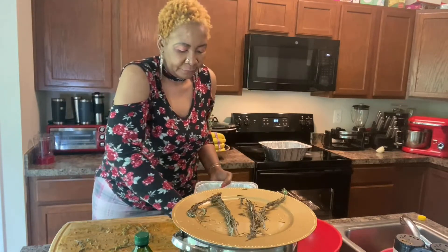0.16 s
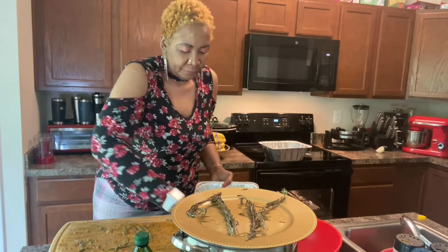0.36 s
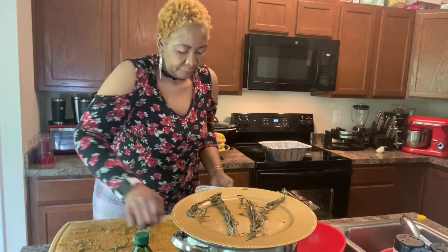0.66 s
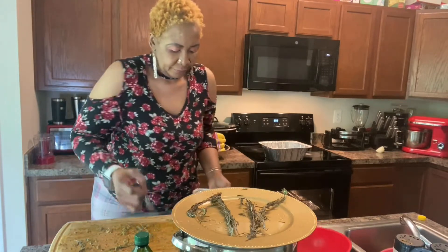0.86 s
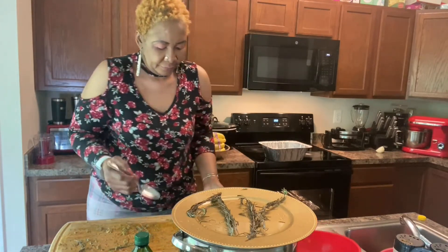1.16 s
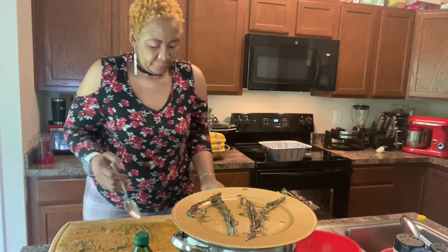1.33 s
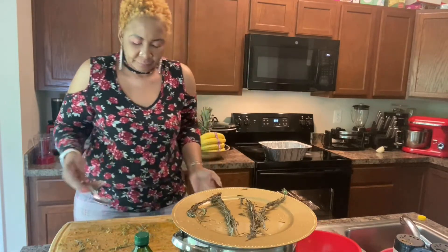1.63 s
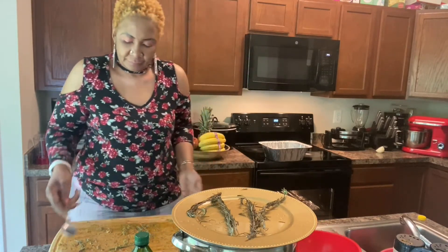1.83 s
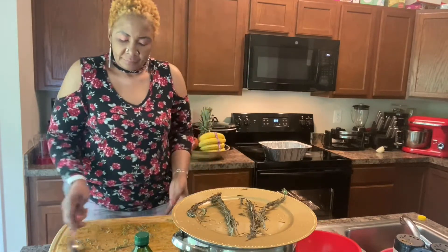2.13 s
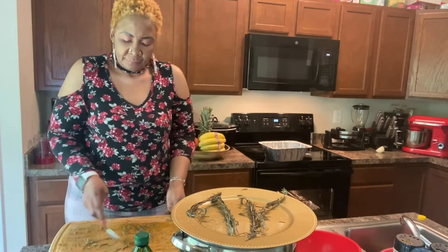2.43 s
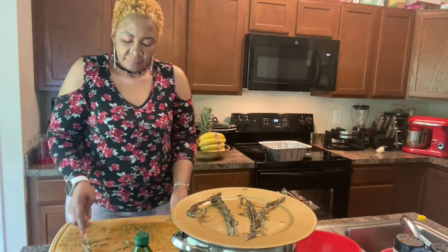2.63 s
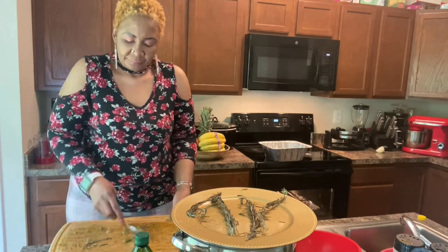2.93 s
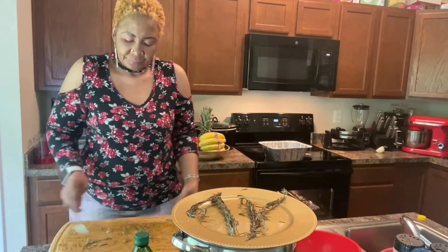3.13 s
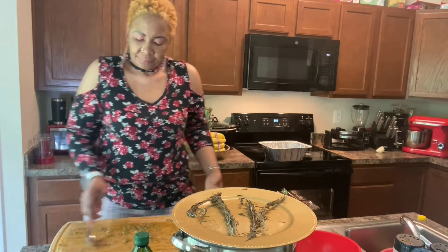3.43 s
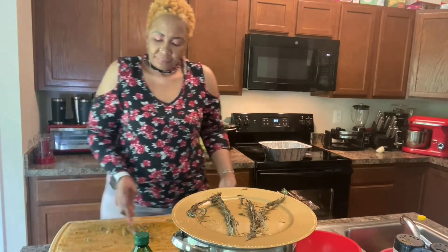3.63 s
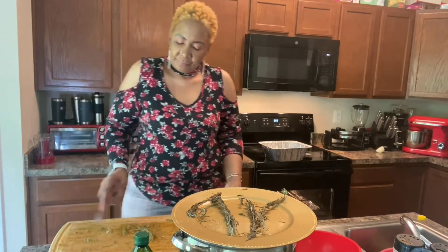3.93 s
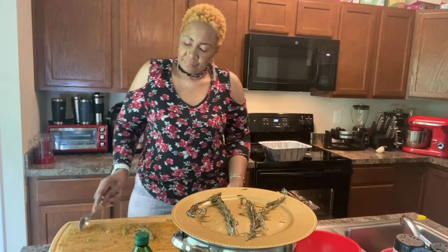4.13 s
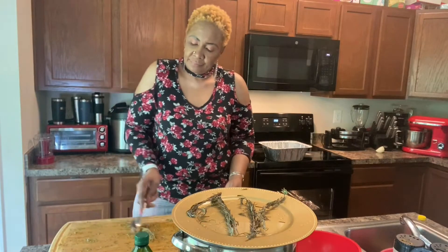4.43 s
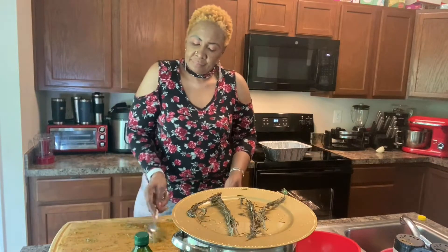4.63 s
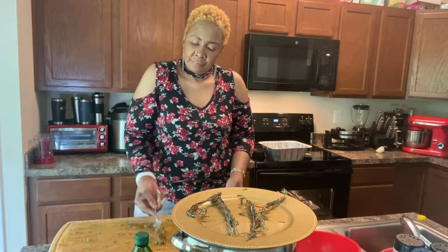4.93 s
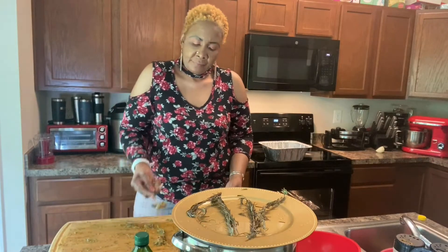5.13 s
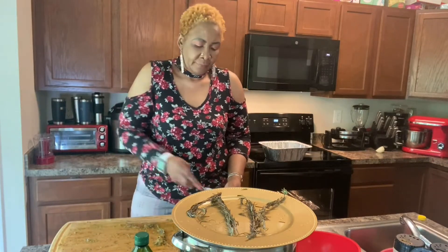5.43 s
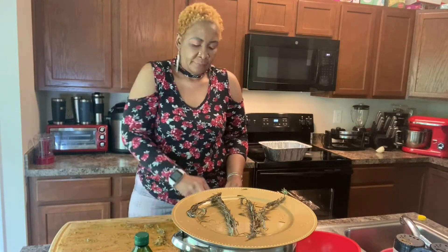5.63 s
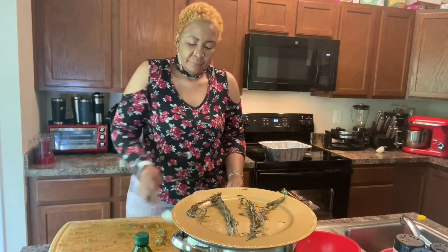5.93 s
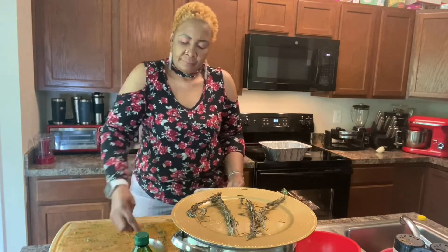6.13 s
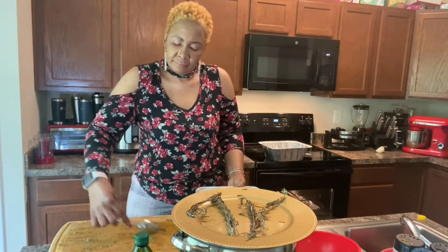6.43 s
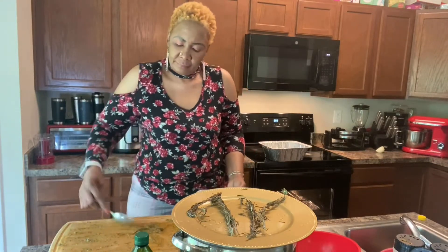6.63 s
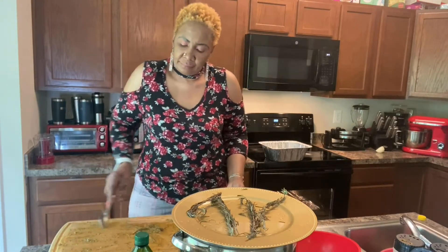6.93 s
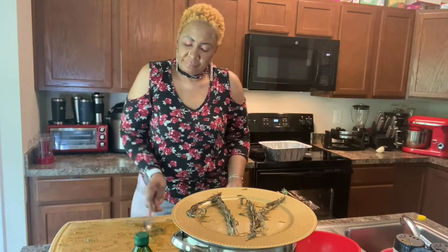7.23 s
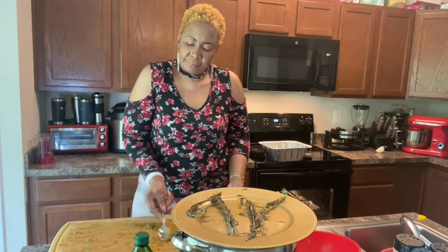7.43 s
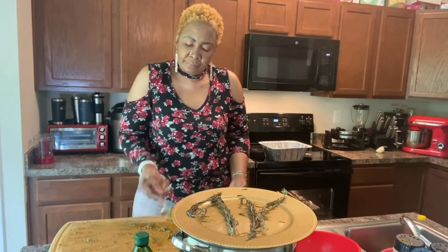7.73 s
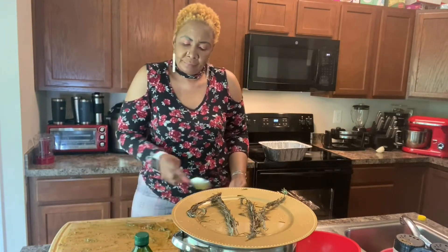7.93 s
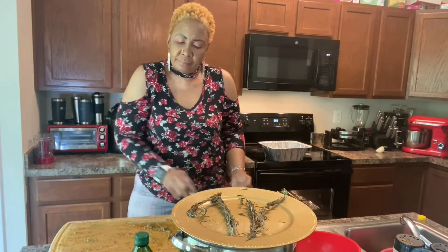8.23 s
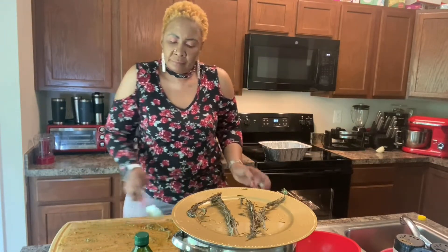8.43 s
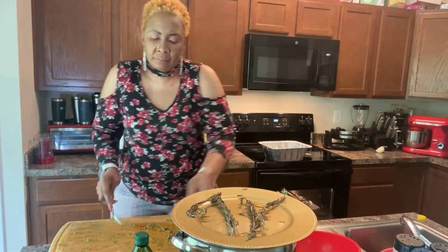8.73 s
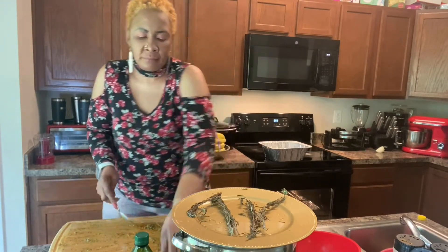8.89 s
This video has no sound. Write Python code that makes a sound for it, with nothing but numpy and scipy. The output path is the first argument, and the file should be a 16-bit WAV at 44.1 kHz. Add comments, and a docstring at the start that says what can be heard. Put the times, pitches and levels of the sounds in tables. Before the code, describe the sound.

A foil pan grinds and bumps against dishes, the strongest knocks coming just before one second. Then a spoon works over a wooden board: soft scrapes, clicking taps, pauses, and a few harder knocks. Late on comes a short bright rasp on foil with a faint crinkle, then a quick bouncing metallic clatter that rings on. Low appliance hum and airy rush continue throughout, in a short, lively kitchen echo, heard through one mono microphone.

```python
"""In a small, hard-walled kitchen an appliance hums throughout: wavering tones over a soft rush of noise.
A foil pan is pushed against dishes: tiny slips ring its floor and walls, and each knock is a crack plus ringing.
Then a metal spoon taps and scrapes a wooden board: slips ring board and spoon, or hiss softly in moist scraps.
The spoon rasps over the foil rim as a short burst of bright slips, and the thin wall crinkles back.
Last, the spoon drops and clatters: four blows with long, metallic ringing."""
import sys
import numpy as np
from scipy import signal
from scipy.fft import rfft, irfft
from scipy.io import wavfile
from scipy.ndimage import uniform_filter1d, map_coordinates

SR = 44100
rng = np.random.default_rng(int(sys.argv[2]) if len(sys.argv) > 2 else 0)


def pcm_store(signal):
    """Save signal as 16-bit PCM."""
    levels = np.round(np.clip(np.atleast_2d(signal), -1, 1) * 32767)
    wavfile.write(sys.argv[1], SR, levels.astype(np.int16).T)


N = 399546
TIME = np.arange(N) / SR

# Event levels below come before the trims set in the sound functions; "re level" means added to level_db.
# appliance tones, before they waver: pitch_hz, level_db
HUM_TONES = [(59.3, -81), (119, -72.5), (258.6, -66), (293.5, -67.5), (387.6, -69.5), (3471, -87)]
# colour of the appliance's rush of air: pitch_hz, density_db_per_hz
AIR_COLOUR = [(18, -45), (30, -28), (53, -19.5), (86, -13.5), (115, -2), (145, -10.5), (194, -6.5),
              (227, -7.5), (295, -2.5), (319, -5), (540, -12.5), (844, -14.5), (2290, -27.5), (5590, -30.5),
              (16000, -47.5)]

# the pan is pushed over the counter:
# peak_s, rise_s, fall_s, level_db, floor_boom_db (re level), grit_db (re level)
PAN_PUSHES = [(.005,.08,.09,-42,-31,-9), (.14,.08,.09,-52,-14,-9), (.295,.06,0.11,-49,-20,-13),
              (.41,0.12,0.13,-47,-14,-11.5), (.535,0.11,0.094,-45,-0.5,-17), (.64,0.094,0.13,-47,1,-14.5),
              (.725,.08,0.1,-51.5,-7,-8), (.86,.15,0.15,-43,-10,-11), (.962,.06,0.075,-34,-20,-24),
              (1.045,0.066,0.1,-34.5,-8.5,-20), (1.125,.06,0.086,-48,-3,-9.5)]
# resonances of the pan's floor: pitch_hz, width_hz, level_db
PAN_FLOOR_MODES = [(128, 26, -9), (179.4, 14, -0.5)]
# resonances of the pan's walls: pitch_hz, width_hz, level_db
PAN_WALL_MODES = [(470, 52, 1.5), (568, 27, 4), (735, 150, 2.5), (926, 140, 2.5), (1093, 42, 2),
                  (1304, 69, -1), (1420, 31, -17)]
# colour of the pan grinding on crumbs: pitch_hz, density_db_per_hz
CRUMB_COLOUR = [(1060, -37), (1800, -3), (2620, -4), (4290, -7.5), (7770, -14), (8750, -19.5), (15100, -23),
                (16000, -27)]

# pan and dishes knock together: start_s, level_db, thump_db (re level), hardness_db (re level)
DISH_KNOCKS = [(.007,-58.5,2,2), (.0625,-44.5,-14,-5), (.073,-35,-13,-7), (.2525,-48,-18,-6),
               (.319,-43.5,-17,-9), (.368,-37,-14,-7.5), (.438,-46.5,-7,-19), (.578,-37.5,-13,-26),
               (.602,-37,-8.5,-13.5), (.7565,-23,-20,-20.5), (.8445,-24,-28,-21), (.924,-39.5,-9.5,-23),
               (1.013,-38,-1,-18), (1.054,-37,-4.5,-13.5), (1.087,-45,-5,-17)]
# what pan and dishes ring with, before detuning: pitch_hz, level_db, t60_s (time to fade by 60 dB)
DISH_MODES = [(182, -15, 0.18), (472, -1, 0.077), (558.6, -4, 0.16), (737, 5.5, 0.061), (918, -0.5, 0.1),
              (1092, 8, 0.098), (1306, -8.5, 0.28), (1530, -5.5, 0.12), (1900, -14.5, 0.41)]
# colour of the knocks' cracks: pitch_hz, density_db_per_hz
DISH_COLOUR = [(41, -70), (70, -26.5), (174, -8), (314, -12.5), (506, -11), (554, -9.5), (664, -7.5),
               (744, -1.5), (892, -1.5), (1000, -10.5), (1410, -7), (2170, -23), (4280, -29.5),
               (13000, -56), (16000, -49)]
# where a blow is split into bass, body, edge and air: crossover_hz
BAND_EDGES_HZ = [400, 1800, 6500]
# single ringing partials; rows close together form one clink, others are a short squeak or a knock's ring:
# start_s, pitch_hz, level_db, t60_s
RINGING_PARTIALS = [(.007, 323, -39, 0.17), (0.062, 5780, -35, 0.05), (.064, 687, -29.5, 0.13),
                    (.073, 852, -30, 0.19), (.066, 9750, -57, 0.26), (.066, 12500, -62, .2),
                    (.066, 13800, -62, .2), (.074, 1886, -39.5, 0.224), (0.073, 3058, -52, 0.28),
                    (.2525, 7680, -57, 0.086), (.746, 1280, -29.5, 0.058), (1.654, 3500, -65, 0.17),
                    (2.862, 852, -42, 0.22), (3.23, 4400, -40.5, 0.016), (3.259, 504.9, -39.5, 0.084),
                    (6.78, 8050, -41, 0.054)]

# the spoon meets the board or the pan's rim:
# start_s, level_db, thump_db (re level), hardness_db (re level), wetness (0 dry .. 1 in moist scraps)
SPOON_TAPS = [(1.654,-76.5,10,5.5,0.91), (2.376,-69,7,5,0.31), (2.822,-70.5,2,20.5,0.28),
              (3.23,-68,0,3,.45), (3.258,-56,-1,-6.5,0.59), (3.765,-53,-15,-2,0.00066),
              (3.944,-59.5,-2,-9,.2), (4.031,-38,-12.5,-4.5,0.02), (4.288,-47,-9,-10,.3),
              (4.41,-71,-1,1.5,0.95), (4.929,-57,2.5,-4,0.53), (5.537,-49.5,-12,-8.5,0.55),
              (5.559,-73.5,5,16,0.82), (5.929,-43.5,-11.5,-6.5,0), (6.061,-39,-22,-9.5,0.042),
              (6.551,-49.5,-3.5,-6,.55), (6.7795,-37,-19,-6,.22), (6.91,-41.5,-19.5,-14.5,.15),
              (6.926,-42,-18,-9.5,0.0082), (8.082,-64.5,4,1,1)]
# what the board rings with, before detuning: pitch_hz, level_db, t60_s
BOARD_MODES = [(499, 2, 0.065), (812, 7.5, 0.066), (1117, -1, 0.069), (1435.5, 5.5, 0.051),
               (1796, -9, 0.028), (3340, -16, 0.078), (4100, -8, .04), (5050, -1.5, 0.04),
               (6070, -7.5, 0.024), (8050, -26, 0.022), (9770, -29, 0.063), (12700, -23, 0.11),
               (13400, -33, .07)]
# colour of the taps' cracks: pitch_hz, density_db_per_hz
TAP_COLOUR = [(200, -19.5), (500, -10), (1000, 2.5), (1400, -1.5), (1900, -2), (2400, -11.5), (3600, -9.5),
              (5200, -23.5), (8000, -34), (16000, -43.5)]

# spoon strokes on the board: peak_s, rise_s, fall_s, level_db, scratch_db (re level), hiss_db (re level),
# bite (1 bare edge on wood .. 0 smearing moist scraps)
SPOON_STROKES = [(2.11,0.07,.06,-55.5,-3,-13,0.99), (2.22,0.15,.14,-50.5,1,-6.5,0.89),
                 (2.705,.08,0.0804,-57.5,3.5,-5,1), (2.785,.07,.07,-67.5,0.5,4.5,0.17),
                 (2.867,0.0564,0.057,-44.5,-3.5,-13.5,0.59), (3.22,.12,.12,-71.5,4,-2,.95),
                 (3.39,0.074,0.11,-47.5,-5,-10,.95), (3.495,0.13,.18,-39,-5.5,-17.5,.7),
                 (3.62,.06,0.096,-60,-12,-8.5,0.38), (4.215,.11,0.15,-40.5,-5,-14.5,.9),
                 (4.37,0.14,0.13,-47,-4.5,-14,.6), (4.6,.13,0.12,-62.5,-2,-4.5,0),
                 (5.0,.08,0.31,-62.5,-7.5,-13,0), (5.66,0.11,.14,-57.5,-11.5,-13.5,0),
                 (6.165,.085,.12,-54.5,-8.5,-16,1), (6.345,.14,.16,-63,0,-4,0.018),
                 (6.89,0.071,.12,-51,-6,-20,0.98), (7.04,.15,.2,-44.5,-1,-12,.75),
                 (7.14,.06,.11,-50.5,-4.5,-19,.6), (7.225,0.084,0.059,-47.5,-15,-22,.3),
                 (7.305,0.051,0.075,-57,-6,-14,.1), (7.41,0.083,0.14,-58.5,-3,-13.5,0.062),
                 (7.635,0.11,0.059,-67,2,-18,.4)]
# colour of the scraping: pitch_hz, density_db_per_hz
SCRAPE_COLOUR = [(200, -29.5), (450, -2), (800, 1), (1300, -5), (1800, -5.5), (3000, -9.5), (4500, -14),
                 (8000, -23.5), (10500, -31.5), (16000, -33.5)]
# resonances of board and hand-held spoon, before the pitch wanders: pitch_hz, width_hz, level_db
SCRAPE_MODES = [(787, 99, 1.5), (1245, 320, 4.5), (2050, 620, 0), (2875, 310, 1.5), (3500, 170, 2.5),
                (4050, 190, -4), (5100, 220, 4.5), (6055, 160, 8), (7800, 290, 1.5), (9100, 170, 7.5),
                (9260, 89, 4), (12300, 250, 8.5), (13350, 200, 11), (15200, 220, 2)]

# Three movements at the foil rim; delay_s is the peak counted from RIM_S.
# a soft drag just ahead of the catch and through it: delay_s, rise_s, fall_s, level_db
RIM_DRAG = (-0.05, 0.01, 0.16, -55)
# the loud rasp as the spoon catches the rim: delay_s, rise_s, fall_s, level_db
RIM_CATCH = (0, .0095, 0, -35.5)
# the foil wall flexes back: delay_s, rise_s, fall_s, level_db
FOIL_FLEX = (0.2, 0.06, 0.06, -47)
# colour of the rasp: pitch_hz, density_db_per_hz
RASP_COLOUR = [(1180, -56), (2000, -32), (2780, -7.5), (3200, -14), (4490, -1.5), (4900, -2), (6880, -0.5),
               (7640, -3), (8850, -19), (9660, -11), (10900, -23), (14300, -21), (16000, -30)]
# resonances of the foil wall: pitch_hz, width_hz, level_db
FOIL_MODES = [(356, 44, 2), (930, 230, -5.5), (1460, 630, -14.5), (2400, 350, -10), (2820, 140, -11)]

# the spoon falls and bounces: start_s, level_db, thump_db (re level), hardness_db (re level)
SPOON_DROP = [(8.8815,-43,-21,11), (8.9165,-32.5,-28,3.5), (8.937,-41,-29,5.5), (8.987,-43.5,-6,2)]
# what the dropped spoon rings with, before detuning: pitch_hz, level_db, t60_s
DROP_MODES = [(1028, 4, .2), (1127, -1, .3), (1230, 5, 0.22), (1414, 3, 0.26), (1762, -6, .45),
              (1915, -3, .45), (2400, 0, 0.94), (2630, -1, 0.7), (2670, -1, 0.56), (2885, 1.5, 0.65),
              (2962, -8, .35), (4035, -10, .3), (4470, -7, .25), (4870, -13, .3), (5650, -2, 0.23),
              (5860, -3, 0.2), (7327, -16, .2)]
# colour of the drop's cracks: pitch_hz, density_db_per_hz
DROP_COLOUR = [(120, -55), (200, -23), (347, -25), (440, -10.5), (635, -6), (696, -13), (1020, -4),
               (2050, -2.5), (2290, -11.5), (2610, -4.5), (4520, -4.5), (5940, -7.5), (16000, -19)]

# how long the room's tail takes to fade by 60 dB: pitch_hz, t60_s
ROOM_T60 = [(120, 0.34), (500, 0.39), (1500, 0.38), (5000, 0.33), (9000, .3), (15000, 0.19)]

AIR_LEVEL_DB = -58.19
SWELL_DB, SWELL_SHAPE = 20, 1.408   # drop at the ends of rise and fall; shape 1 = pointed, 2 = round
FIRM_DB, GLANCE_RANGE_DB, GLANCE_TAIL_DB = -37, 8, 5.5   # lighter blows glance and get a stronger tail
WET_AIR_DB = 29   # a fully wet tap spits this much more in the top band
BITE_LOSS_PER_S = 1.6   # scraps gather under the edge, so bite falls during a stroke
HISS_LEAD_S, BOARD_LAG_S = 0.015, 0.0055   # the edge hisses first; the board answers as the hand bears down
RIM_S, RASP_SHAPE = 8.139, 3.5   # moment of the catch; a high shape makes a more abrupt swell
CUTOFF_HZ = 15900


def from_db(db):
    """Turn decibels into a plain gain."""
    return 10 ** (np.asarray(db) / 20)


def rms(x):
    """Average strength of a sound."""
    return np.sqrt(np.mean(x ** 2) + 1e-20)


def at_hz(points, hz):
    """Read a table between its points, on a log-frequency axis."""
    f, value = np.transpose(points)
    return np.interp(np.log(np.maximum(hz, 1)), np.log(f), value)


def drift(rate):
    """Slow chance with an rms of one, made by joining `rate` random points per second."""
    knots = rng.standard_normal(int(N / SR * rate) + 2)
    slow = np.interp(TIME * rate, np.arange(len(knots)), knots)
    return slow / rms(slow)


def coloured(x, spectrum):
    """Filter a sound with the given spectrum, adding nothing ahead of it (minimum phase); rms 1."""
    size = 8192
    half = size // 2
    levels_db = at_hz(spectrum, np.arange(half + 1) * SR / size)
    # folding the cepstrum forward in time gives the minimum-phase filter
    cepstrum = irfft(np.log(from_db(levels_db)))
    cepstrum[1:half] *= 2
    cepstrum[half + 1:] = 0
    response = irfft(np.exp(rfft(cepstrum)))[:half]
    y = signal.oaconvolve(x, response)[:len(x)]
    return y / rms(y)


def resonate(x, modes, waver_db):
    """Side-by-side resonances; their weights wander as the contact point moves."""
    out = 0
    for hz, width, db in modes:
        r = np.exp(-np.pi * width / SR)   # a wider resonance dies faster
        feedback = [1, -2 * r * np.cos(2 * np.pi * hz / SR), r * r]
        ringing = (1 - r * r) / 2 * signal.lfilter([1, 0, -1], feedback, x)
        out = out + from_db(db + waver_db * drift(5)) * ringing
    return out


def split(x, edges):
    """Cut a sound into bands with steep crossovers, lowest band first."""
    bands = []
    for hz in edges:
        low = signal.butter(4, hz, "low", fs=SR, output="sos")
        high = signal.butter(4, hz, "high", fs=SR, output="sos")
        bands.append(signal.sosfilt(np.vstack([low, low]), x))
        x = signal.sosfilt(np.vstack([high, high]), x)
    return bands + [x]


def kitchen(x, room_db):
    """Direct sound plus a diffuse tail whose treble dies first; each call draws its own tail."""
    t = TIME[:SR // 2]
    noise_bands = split(rng.standard_normal(len(t)), np.geomspace(300, 9600, 4))
    centres = np.geomspace(170, 15000, 5)
    tail = sum(band * from_db(-60 * t / at_hz(ROOM_T60, hz)) for band, hz in zip(noise_bands, centres))
    tail *= 1 - np.exp(-(t / 0.0025) ** 2)   # the first echoes need a few ms
    echo = signal.oaconvolve(x, tail / np.linalg.norm(tail))[:len(x)]
    return x + from_db(room_db) * echo


def swell(peak_s, rise_s, fall_s, level_db, shape=SWELL_SHAPE):
    """Gain of one hand movement: it gathers speed up to its peak and eases off."""
    away = np.maximum((peak_s - TIME) / rise_s, (TIME - peak_s) / fall_s)
    gain, near = np.zeros(N), away < 3
    gain[near] = from_db(level_db - SWELL_DB * away[near] ** shape)
    return gain


def together(swells):
    """Overlapping movements add in power."""
    return np.sqrt(sum(g ** 2 for g in swells))


def friction(slips_per_s, spread_db, judder_db):
    """Dense little slips of uneven size, bunched by the judder of the hand."""
    sizes = from_db(spread_db * np.minimum(rng.exponential(1, N), 4)) * rng.standard_normal(N)
    happens = rng.random(N) < slips_per_s / SR
    slips = sizes * happens * from_db(judder_db * drift(90))
    return slips / rms(slips)


def band_weights(air_db, level_db, thump_db, hard_db, wet=0):
    """Bass, body, edge and air of a blow in dB: weight thumps, a hard contact is bright, a wet one spits."""
    return level_db + np.array([thump_db, 0, hard_db, hard_db + air_db + WET_AIR_DB * wet])


def blows(events, colour, modes, ring_db, chatter_db, contact_t60, mistune, level_db, air_db, room_db):
    """Each blow is a crack with chatter plus ringing; how it lands sets the weight of its four bands."""
    out, t = np.zeros(N + SR), TIME[:int(.6 * SR)]
    attack = int(.03 * SR)   # band levels are set over the first 30 ms
    for s, blow_db, *landing in events:
        chatter = rng.standard_normal(len(t)) * from_db(-60 * t / contact_t60)
        contact = from_db(chatter_db) * chatter / np.linalg.norm(chatter) + (t == 0)

        strengths = from_db(rng.normal(0, 3.0, len(modes))) * rng.choice([-1, 1], len(modes))
        detunes = 1 + mistune * rng.standard_normal(len(modes))   # grip and support shift the modes
        ring = np.zeros(len(t))
        for strength, detune, (hz, db, t60) in zip(strengths, detunes, modes):
            ring += strength * from_db(db - 60 * t / t60) * np.sin(2 * np.pi * hz * detune * t)

        direct = coloured(contact, colour) + from_db(ring_db) * ring / rms(ring)
        glance = np.clip((FIRM_DB - blow_db) / GLANCE_RANGE_DB, 0, 1)
        sound = kitchen(direct, room_db + GLANCE_TAIL_DB * glance)
        start = int(s * SR)
        for band, db in zip(split(sound, BAND_EDGES_HZ), band_weights(air_db, blow_db, *landing)):
            out[start:start + len(t)] += from_db(db + level_db) * band / rms(band[:attack])
    return out[:N]


def appliance(waver_db):
    """Mains and fan tones waver in level and phase over a soft rush of air."""
    hum = np.zeros(N)
    for hz, db in HUM_TONES:
        gain = from_db(db + waver_db * drift(5.6)) * np.sqrt(2)   # sqrt(2): dB is the tone's rms
        hum += gain * np.sin(2 * np.pi * hz * TIME + 0.65 * drift(6))
    return hum + from_db(AIR_LEVEL_DB) * coloured(rng.standard_normal(N), AIR_COLOUR)


def pan_slide(boom_db, body_db, grit_db):
    """The dragged pan booms with its floor, rattles with its walls and grinds on crumbs."""
    booms, bodies, grits = [], [], []
    for *movement, low_db, high_db in PAN_PUSHES:
        push = swell(*movement)
        booms.append(push * from_db(low_db))
        bodies.append(push)
        grits.append(push * from_db(high_db))
    slips = friction(slips_per_s=600, spread_db=1.5, judder_db=2.5)
    floor = split(resonate(slips, PAN_FLOOR_MODES, waver_db=-0.5), [100, 300])[1]
    walls = split(resonate(slips, PAN_WALL_MODES, waver_db=2.5), [260, 1750])[1]
    crumbs = coloured(friction(slips_per_s=5000, spread_db=0.0, judder_db=1.0), CRUMB_COLOUR)
    sound = from_db(boom_db) * together(booms) * floor / rms(floor)
    sound += from_db(body_db) * together(bodies) * walls / rms(walls)
    sound += from_db(grit_db) * together(grits) * crumbs
    return kitchen(sound, room_db=-4)


def dish_knocks():
    """Pan and dishes knock: a short crack sets off dull, quickly fading modes."""
    return blows(DISH_KNOCKS, DISH_COLOUR, DISH_MODES, ring_db=-3.5, chatter_db=4.5, contact_t60=0.038,
                 mistune=0.0112, level_db=-2, air_db=-10.5, room_db=-1.5)


def ringing_partials(roughness):
    """Single fading tones, a little unsteady, that make up a clink, a short squeak or a knock's ring."""
    out, t = np.zeros(N), TIME[:SR // 2]
    for s, hz, db, t60 in RINGING_PARTIALS:
        start = int(s * SR)
        wobble = roughness * drift(10 / t60)[:len(t)]
        out[start:start + len(t)] += from_db(db - 60 * t / t60) * np.sin(2 * np.pi * hz * t + wobble)
    return kitchen(out, room_db=-5.5)


def spoon_taps():
    """The spoon taps down: a crack and the board's short ringing, with extra top where scraps are wet."""
    return blows(SPOON_TAPS, TAP_COLOUR, BOARD_MODES, ring_db=-6.5, chatter_db=7.5, contact_t60=0.031,
                 mistune=0.024, level_db=-1.5, air_db=-20.0, room_db=-3.5)


def stroke_controls():
    """Gains of board, scratch and hiss, and the bite of whichever stroke is strongest."""
    board, scratch, hiss, bite, strongest = [], [], [], np.zeros(N), np.zeros(N)
    for s, rise, fall, db, scratch_db, hiss_db, grip in SPOON_STROKES:
        board.append(swell(s + BOARD_LAG_S, rise, fall, db))
        scratch.append(swell(s, rise, fall, db + scratch_db))
        hiss.append(swell(s - HISS_LEAD_S, rise, fall, db + hiss_db))
        leads = scratch[-1] > strongest
        bite[leads] = grip * (1 - BITE_LOSS_PER_S * (TIME[leads] - s))
        strongest = np.maximum(strongest, scratch[-1])
    gains = [together(g) for g in (board, scratch, hiss)]
    return gains, np.clip(uniform_filter1d(bite, size=2000), 0, 1)


def counter_echo(x, lag_s, swing_s, echo_db):
    """The reflection off the counter shifts as the hand moves, so its comb of peaks wanders."""
    return x + from_db(echo_db) * np.interp(TIME - lag_s - swing_s * drift(7), TIME, x)


def scraping(board_db, scratch_db, hiss_db):
    """The bare edge slips over the wood and rings board and spoon; moist scraps damp this to a soft hiss."""
    gains, bite = stroke_controls()
    slips = friction(slips_per_s=6000, spread_db=1.9, judder_db=1.9)
    # the spoon's pitch sags a little as it lies flatter and wanders with the grip
    pitch = 1 + .025 * (bite - .8) + .007 * drift(6)
    steady = resonate(slips, SCRAPE_MODES, waver_db=2.0)
    # reading the sound faster or slower bends its pitch
    ringing = map_coordinates(steady, [np.cumsum(pitch)], order=3, mode="mirror")
    smear = coloured(friction(slips_per_s=9000, spread_db=1.8, judder_db=2.0), SCRAPE_COLOUR)
    rub = np.sqrt(bite) * coloured(ringing, SCRAPE_COLOUR) + np.sqrt(1.1 - bite) * smear
    echoed = counter_echo(rub, lag_s=.0024, swing_s=0.00016, echo_db=-9.5)
    bands = split(echoed, BAND_EDGES_HZ[1:])   # board, scratch, hiss
    trims_db = (board_db, scratch_db, hiss_db)
    sound = sum(from_db(db) * g * band / rms(band) for db, g, band in zip(trims_db, gains, bands))
    return kitchen(sound, room_db=-7.0)


def foil_rim():
    """Quick bright slips rasp along the crimped rim, then the thin wall's resonances crinkle."""
    def movement(delay_s, *rest):
        return swell(RIM_S + delay_s, *rest)

    drag, catch, flex = movement(*RIM_DRAG), movement(*RIM_CATCH, RASP_SHAPE), movement(*FOIL_FLEX)
    slips = friction(slips_per_s=9000, spread_db=4.0, judder_db=1.5)
    rasp = (catch + drag) * coloured(slips, RASP_COLOUR)
    crinkles = friction(slips_per_s=2500, spread_db=1.5, judder_db=-2.5)
    wall = split(resonate(crinkles, FOIL_MODES, waver_db=1.0), [3600])[0]
    return kitchen(rasp + flex * wall / rms(wall), room_db=-2.5)


def spoon_drop():
    """The spoon falls and bounces: each blow sets its long metallic modes ringing, nearly in tune."""
    return blows(SPOON_DROP, DROP_COLOUR, DROP_MODES, ring_db=-6.5, chatter_db=12.5, contact_t60=0.076,
                 mistune=0.00027, level_db=0.0, air_db=-15.0, room_db=-0.5)


def scene():
    """Add all sounds together as one channel."""
    mix = appliance(waver_db=2.5)
    mix += pan_slide(boom_db=-1.0, body_db=-3.5, grit_db=-0.5)
    mix += dish_knocks()
    mix += ringing_partials(roughness=1.0)   # radians
    mix += spoon_taps()
    mix += scraping(board_db=-1.7, scratch_db=-2.0, hiss_db=-0.5)
    mix += foil_rim()
    mix += spoon_drop()
    return mix[None]


def record(dry):
    """The microphone loses the deepest bass; the top is cut."""
    thin = signal.sosfilt(signal.butter(7, 43, "high", fs=SR, output="sos"), dry)
    return signal.sosfilt(signal.ellip(12, .1, 80, CUTOFF_HZ, fs=SR, output="sos"), thin)


dry = scene()
out = record(dry)
pcm_store(out)
```